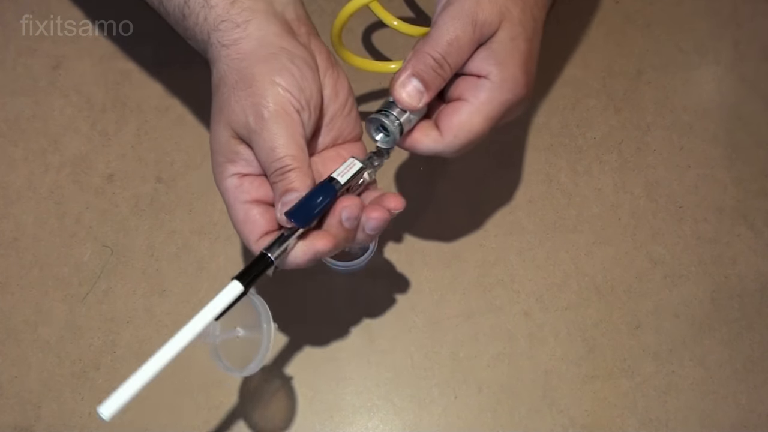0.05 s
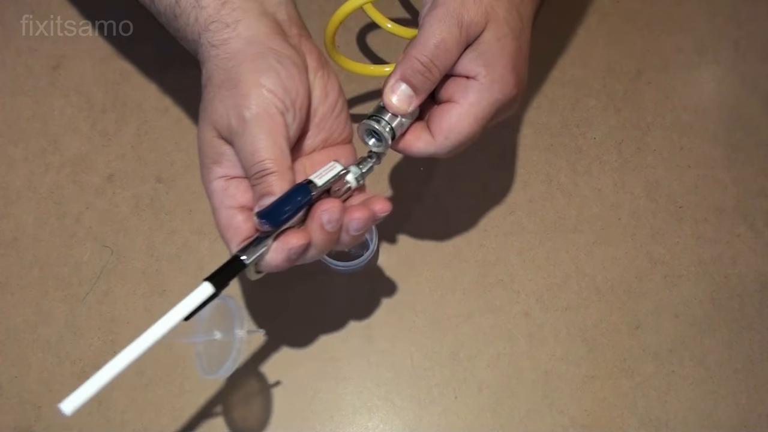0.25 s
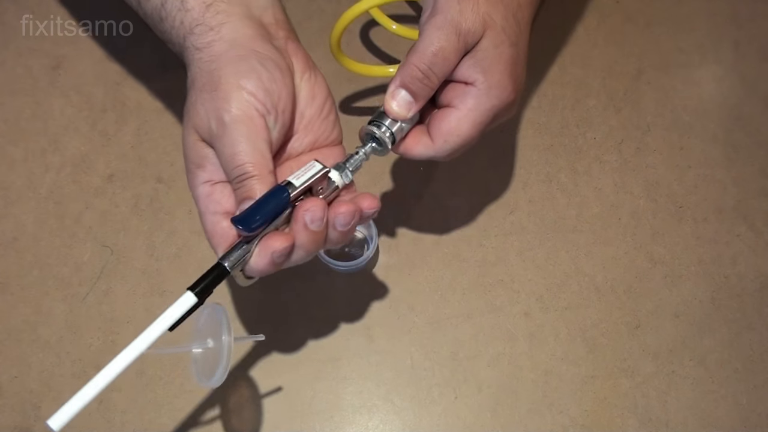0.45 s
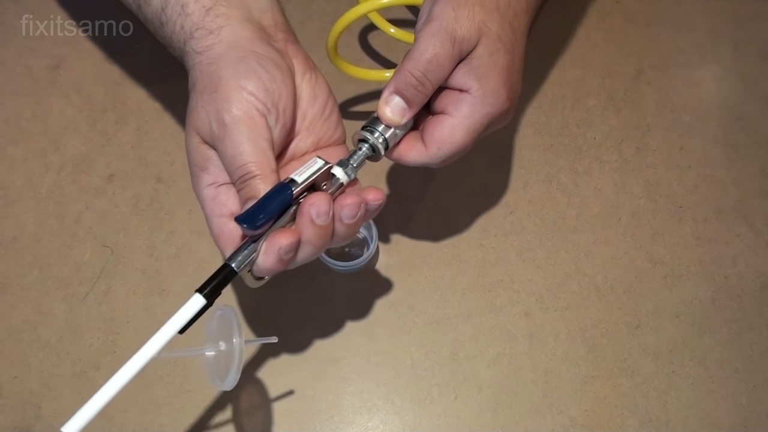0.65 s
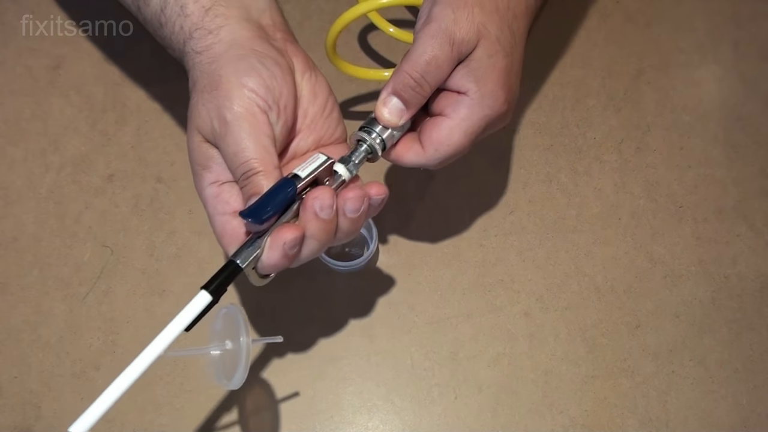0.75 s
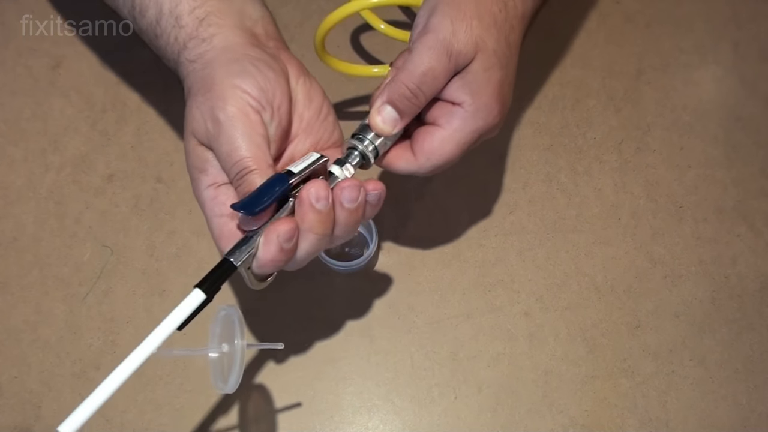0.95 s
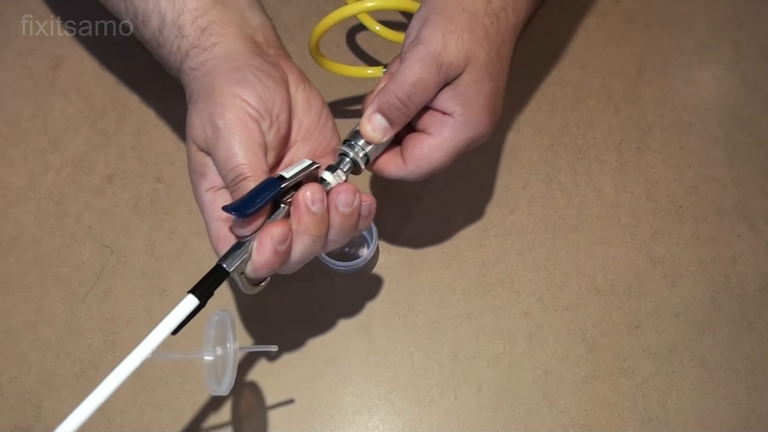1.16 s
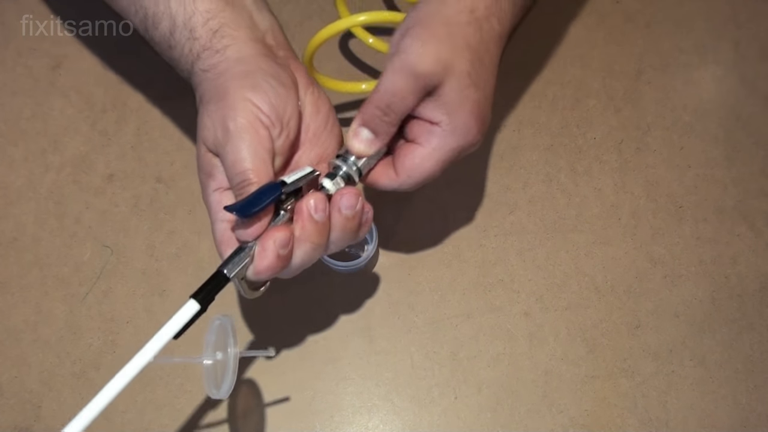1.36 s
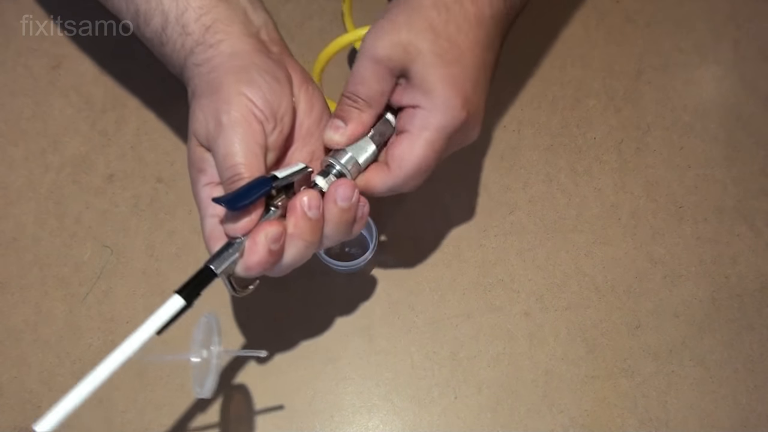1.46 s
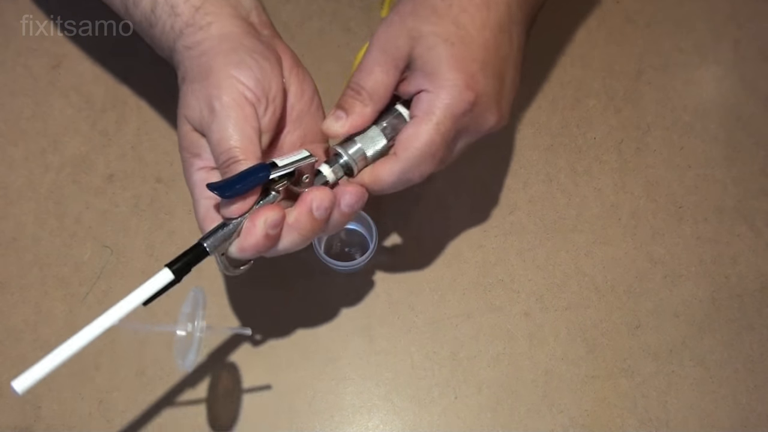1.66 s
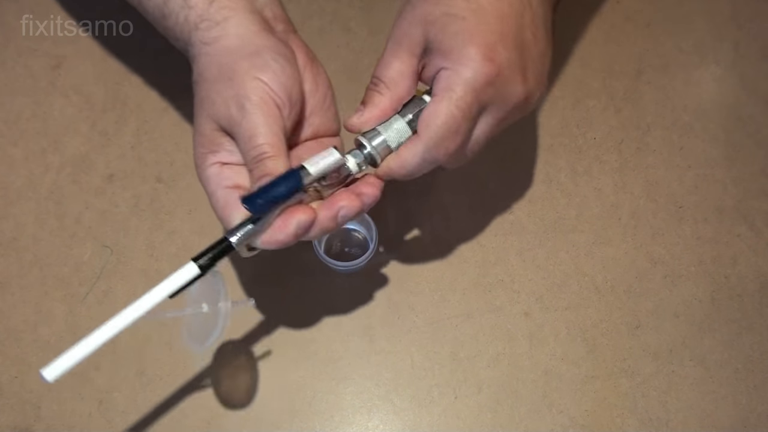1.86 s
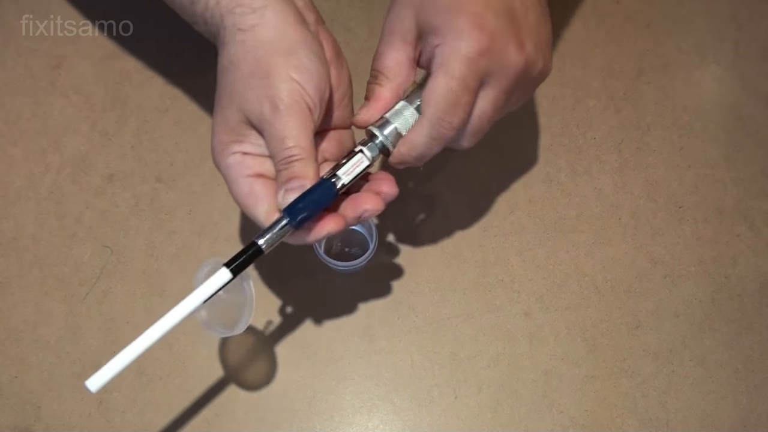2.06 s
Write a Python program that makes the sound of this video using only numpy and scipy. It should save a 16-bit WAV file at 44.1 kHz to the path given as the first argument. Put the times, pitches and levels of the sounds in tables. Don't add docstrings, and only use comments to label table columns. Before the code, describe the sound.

Close metal clicks and a clustered rattle of a hose coupler, a pause, then a sudden brief air hiss ending in a snap, followed by small ticks; soft room hush and faint low hum behind.

```python
import sys
import numpy as np
from scipy import signal
from scipy.fft import rfft, irfft
from scipy.io import wavfile
from scipy.ndimage import uniform_filter1d

SR = 44100
rng = np.random.default_rng(int(sys.argv[2]) if len(sys.argv) > 2 else 0)


def linear_from_db(decibels):
    return 10 ** (np.asarray(decibels, float) / 20)


def inscribe(sig):
    pcm = np.round(np.clip(np.atleast_2d(sig).T, -1, 1) * 32767)
    wavfile.write(sys.argv[1], SR, pcm.astype(np.int16))


N = 93095

# (pitch [Hz], level [dB], time to fade by 60 dB [s])
STEEL_MODES = [(689, -34, 0.045), (1720, -14.5, 0.015), (2095, -8, 0.015), (2645, -2.5, .018),
               (2770, -1.5, 0.0093), (3400, 1, 0.0043), (3894, -2, 0.0088), (4300, -0.5, 0.0095),
               (4970, -2.5, 0.0038), (5540, -5.5, 0.0044), (6786, -4.5, 0.01), (7200, 0, 0.0074),
               (9300, -8, 0.0095), (11430, -12, 0.0053)]


def evened(x):
    return x / np.sqrt(np.mean(x ** 2) + 1e-20)


def read(points, hz):
    f, value = np.transpose(points)
    return np.interp(np.log(hz + 1), np.log(f + 1), value)


def curve(points):
    s, value = np.transpose(points)
    return np.interp(np.arange(N) / SR, s, value)


def add(mix, s, sound):
    part = mix[round(s * SR):][:len(sound)]
    part += sound[:len(part)]


def coloured(x, points):
    hz = np.fft.rfftfreq(x.shape[-1], 1 / SR)
    return irfft(rfft(x) * linear_from_db(read(points, hz)), x.shape[-1])


def alike(pair, points):
    hz = np.fft.rfftfreq(pair.shape[1], 1 / SR)
    same = np.clip(read(points, hz), 0, 1)
    mid, side = rfft(pair) * np.sqrt([(1 + same) / 2, (1 - same) / 2])
    return irfft(np.array([mid + side, mid - side]), pair.shape[1])


def resonate(x, hz, width):
    turn = np.exp(2j * np.pi * hz * np.arange(len(x)) / SR)
    r = np.exp(-np.pi * width / SR)
    return 2 * (turn * signal.lfilter([1 - r], [1, -r], x / turn)).real


def hush():
    # (frequency [Hz], level [dB per Hz])
    tone_colour = [(12, -30), (20, -7.5), (232, -16), (404, -11), (534, -12.5), (631, -16), (767, -14.5),
                   (906, -13), (15500, -37)]
    # (frequency [Hz], left-right likeness [0 to 1])
    tone_likeness = [(60, 1), (240, 0.77), (950, 0.23), (3770, 0.62), (15000, 0.65)]
    # (pitch [Hz], level [dB])
    hums = [(119, -69.5), (143, -74), (240, -70)]
    # (time [s], level [dB])
    drift = [(0, 3.5), (.3, 5.5), (.55, 2), (1.2, 3.5), (1.8, 0.7), (2.11, 1)]
    noise = coloured(rng.standard_normal((2, N)), tone_colour)
    tone = linear_from_db(-58) * evened(alike(noise, tone_likeness))
    drone = sum(linear_from_db(db) * evened(resonate(rng.standard_normal(N), hz, 9.2)) for hz, db in hums)
    return (tone + drone) * linear_from_db(curve(drift))


def tail():
    # (frequency [Hz], time to fade by 60 dB [s])
    fading = [(150, 0.42), (1000, 0.64), (3000, 0.51), (6000, 0.55), (10000, 0.35), (15000, 0.32)]
    # (frequency [Hz], left-right likeness [0 to 1])
    tail_likeness = [(200, 0.98), (1000, 0.69), (2500, .85), (5000, 0.79), (9500, 0.19), (10600, 0.94)]
    # (delay [s], level [dB])
    echoes = [(.0022, -13.5), (0.0117, -17), (0.02, -26.5)]
    tail_db = -8.5
    taps = np.zeros((2, SR))
    slots = np.arange(160, SR - 20, 10)
    at = slots + rng.integers(0, 10, (2, len(slots)))
    np.put_along_axis(taps, at, rng.choice([-1., 1.], at.shape), 1)
    hz, t, z = signal.stft(alike(taps, tail_likeness), SR, nperseg=256)
    out = signal.istft(z * linear_from_db(-60 * t / read(fading, hz)[:, None]), SR, nperseg=256)[1]
    out = out * (np.arange(out.shape[1]) > 150)
    out = out * linear_from_db(tail_db) / np.linalg.norm(out[0])
    for s, db in echoes:
        out[:, round(s * SR * rng.uniform(.9, 1.1))] += linear_from_db(db)
    return out


def room(x):
    shift_per_s = 9.
    turn = 2 * np.pi * shift_per_s * np.arange(N) / SR
    shares = [np.sqrt(2 / 3) * np.cos(turn + k * np.pi / 3) for k in range(3)]
    return sum(signal.fftconvolve((x * abs(share))[None], tail(), axes=1)[:, :N] for share in shares)


def jet():
    # (time [s], level [dB])
    flow = [(1.344, -48), (1.346, -22.5), (1.355, -19.5), (1.361, -22), (1.385, -18.5), (1.469, -21.5),
            (1.479, -13.5), (1.483, -33), (1.5, -44)]
    # (frequency [Hz], level [dB per Hz])
    hiss_colour = [(290, -19.5), (500, -14.5), (847, -18), (1120, -27), (1480, -12), (2690, -11),
                   (12500, -0.5), (15800, -12.5), (16500, -55.5)]
    # (pitch [Hz], level [dB], time to fade by 60 dB [s])
    hose_modes = [(133, -24, 0.17), (253, -28.5, 0.216), (820, -26, 0.054), (1505, -35.5, 0.36)]
    flicker_db, spit_db = 2.5, 2.9
    fill_s, fill_rise_s = 1.354, .004
    spits = rng.standard_normal(N) * linear_from_db(spit_db * rng.exponential(1, N))
    hiss = evened(coloured(spits, hiss_colour))
    flicker = evened(uniform_filter1d(rng.standard_normal(N), 60))
    flow_db = curve([(1.33, -120)] + flow + [(1.52, -120)])
    out = hiss * linear_from_db(flow_db + flicker_db * flicker)
    t = np.arange(SR // 2) / SR
    for hz, db, t60 in hose_modes:
        surge = rng.standard_normal(len(t))
        boom = evened(resonate(resonate(surge, hz, .5 * hz ** 1.08), hz, .5 * hz ** 0.81))
        add(out, fill_s, boom * np.minimum(t / fill_rise_s, 1) * linear_from_db(db - 60 * t / t60))
    return out


def ticks():
    # (time [s], peak level [dB], pitch [Hz], length
    # [cycles], puff level [dB])
    tick_events = [(0.008, -25, 3430, 1, -21), (0.154, -42, 4100, 12, -9), (0.164, -39, 4300, 5, -9),
                   (0.184, -42, 10200, 12., -5), (0.188, -43, 10800, 7.8, 8), (0.198, -33, 6450, 8.2, -2.5),
                   (0.203, -21.5, 3580, 1.34, -7), (0.212, -30.5, 3490, 1.8, -2),
                   (1.305, -49, 10000, 7.1, -4), (1.587, -29.5, 2090, 4.2, -19), (1.6, -17.5, 3400, 2, 0),
                   (1.61, -25, 10640, 5.1, 5), (1.779, -26.5, 7200, 2.5, -1.5),
                   (1.817, -30.5, 3660, 2, -9.5), (2.005, -36, 4060, 3.1, -8.5),
                   (2.015, -37, 7460, 2.3, -9), (2.0625, -32.5, 6940, 5.5, -5.5),
                   (2.066, -38.5, 2260, 2.2, -17), (2.099, -45, 6350, 12., -6), (1.999, -47, 6600, 6.8, -8),
                   (2.058, -43, 6060, 13, -9), (2.058, -49, 9700, 25., -10),
                   (1.3518, -11, 10800, 20.6, 1.5), (0.961, -40.5, 731.5, 8.3, -40)]
    out = np.zeros(N)
    t = np.arange(2400) / SR
    for s, db, hz, cycles, puff_db in tick_events:
        fade = np.exp(-t * hz / cycles) * np.minimum(t / .0004, 1)
        puff = resonate(resonate(rng.standard_normal(len(t)), 14000., 10000.), 14000., 10000.)
        add(out, s, linear_from_db(db) * fade * (np.sin(2 * np.pi * hz * t) + linear_from_db(puff_db) * puff))
    return out


def ring(tilt_db, sleeve_db, chance, damping=1):
    scatter_db, finger_t60 = 5, .015
    crack_db, crack_s, blow_s = -10, 0.002, 0.00067
    t = np.arange(3000) / SR
    hz, db, t60 = np.transpose(STEEL_MODES)[:, :, None]
    level = db + tilt_db * np.log2(hz / 4000) + scatter_db * chance[:len(hz), None]
    level = level + sleeve_db * ((hz > 3200) & (hz < 5000))
    t60 = damping * np.where(hz > 1000, np.minimum(t60, finger_t60), t60)
    pitch = hz * (1 + 0.014 * chance[-len(hz):, None])
    modes = (linear_from_db(level - 60 * t / t60) * np.sin(2 * np.pi * pitch * t)).sum(0)
    noise = resonate(resonate(rng.standard_normal(len(t)), 5000., 6000.), 5000., 6000.)
    crack = noise * np.exp(-t / crack_s) * linear_from_db(crack_db)
    sound = (modes + crack) * np.minimum(t / blow_s, 1)
    return sound / abs(sound).max()


def knocks():
    # (time [s], peak level [dB], brightness [dB per octave], sleeve level [dB])
    blows = [(0.5740, -21.5, -3.5, -1), (0.7825, -12.5, 6, 5.5), (0.8145, -41, -7.5, -17),
             (0.8234, -20, 9, 6.5), (0.8248, -19, -1.9, 5.5), (0.8485, -36.5, -6.5, 6),
             (0.8527, -56.5, -5, -5), (0.8992, -27.5, 9, 6.5), (0.9040, -28.5, 1.5, -1.5),
             (0.9085, -40, -4, 17), (0.9126, -33.5, -3, 5), (0.9195, -42.5, -4.5, -9),
             (0.9311, -28, -7, 11), (0.9455, -25.5, .3, 2), (0.949, -23.5, -5, 2.5), (0.953, -20.5, -2, 3),
             (0.9571, -25, 4.5, 9.8), (0.9602, -12, 8.6, 9), (0.9607, -22, -3.5, 5), (0.9662, -15.5, 0, 0),
             (0.9990, -38.5, -2, 3)]
    # (time [s], level [dB])
    sliding = [(.785, -85), (0.798, -45.5), (.85, -37.5), (.88, -66.5), (0.932, -49), (.955, -26),
               (0.968, -54), (1.002, -58)]
    grains_per_s, sliding_damping = 1900, .4
    out = np.zeros(N)
    chances = rng.standard_normal((len(blows), 2 * len(STEEL_MODES)))
    for (s, db, tilt_db, sleeve_db), chance in zip(blows, chances):
        add(out, s, linear_from_db(db) * ring(tilt_db, sleeve_db, chance))
    grains = (rng.random(N) < grains_per_s / SR) * rng.standard_normal(N)
    grit = grains * linear_from_db(curve([(0, -120)] + sliding + [(1.02, -120)]))
    grain_ring = ring(0, 0, np.zeros(2 * len(STEEL_MODES)), sliding_damping)
    return out + signal.oaconvolve(grit, grain_ring)[:N]


def scene():
    steel, air = knocks() + ticks(), jet()
    air_room_db = 3.5
    return steel + air + room(steel + linear_from_db(air_room_db) * air) + hush()


def top_cut(x):
    return signal.sosfilt(signal.butter(12, 16960, fs=SR, output="sos"), x)


def record(dry):
    # (frequency [Hz], level [dB])
    mic_response = [(20, -11.5), (100, -0.48), (13000, 0.39), (15800, -7), (16200, -49)]
    ceiling = .6
    limited = ceiling * np.tanh(dry / ceiling)
    return top_cut(coloured(limited, mic_response))


dry = scene()
out = record(dry)
inscribe(out)
```